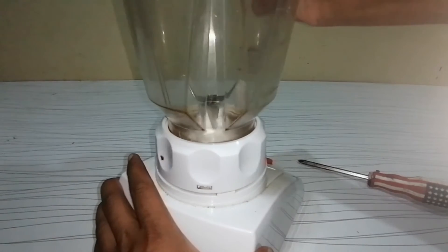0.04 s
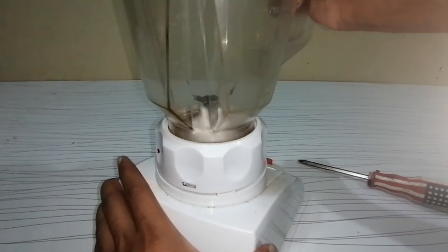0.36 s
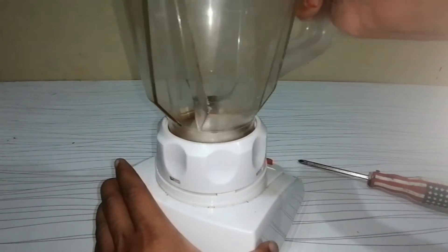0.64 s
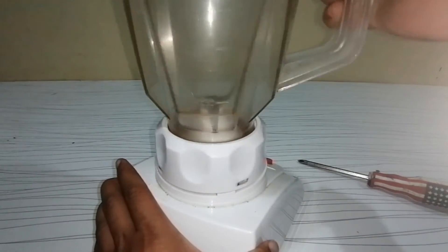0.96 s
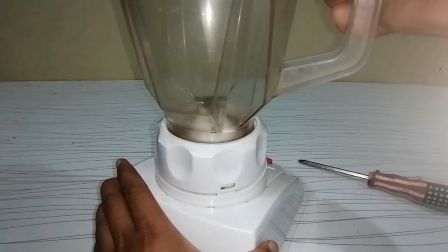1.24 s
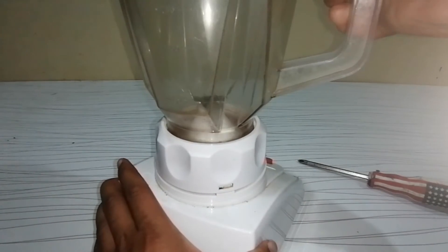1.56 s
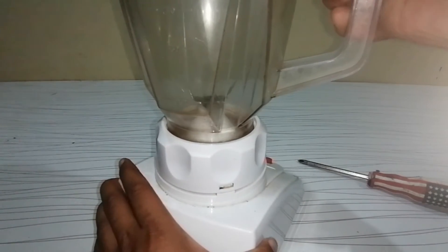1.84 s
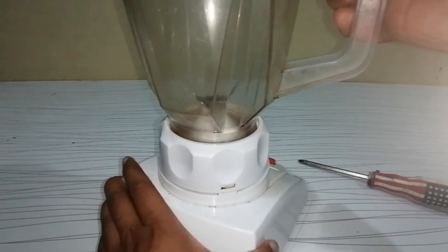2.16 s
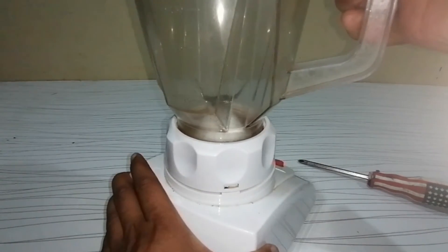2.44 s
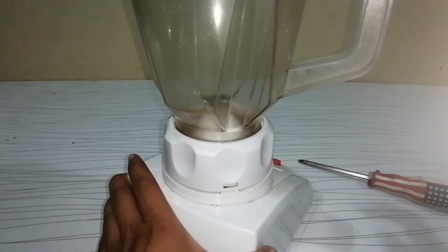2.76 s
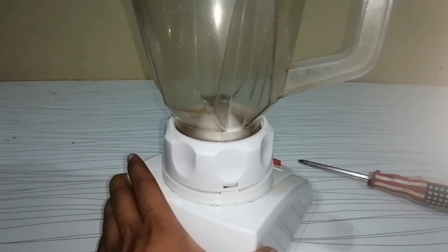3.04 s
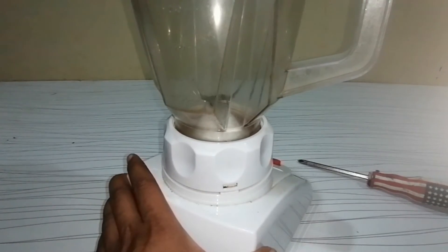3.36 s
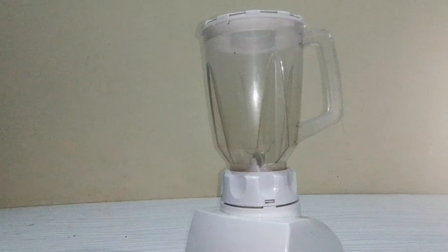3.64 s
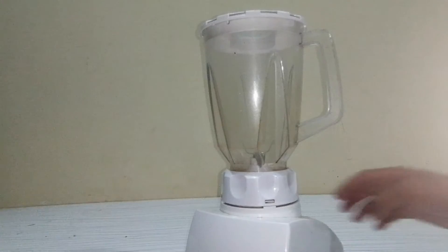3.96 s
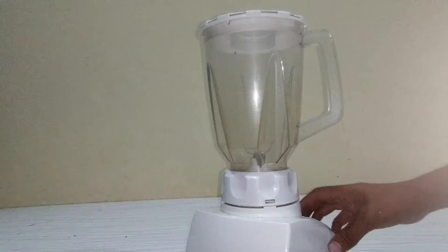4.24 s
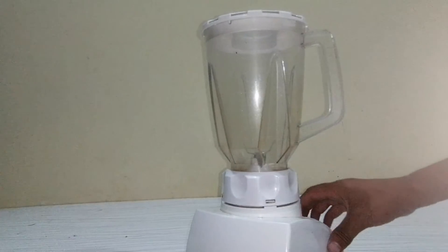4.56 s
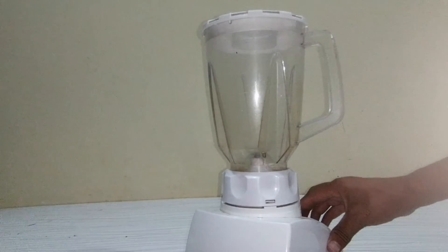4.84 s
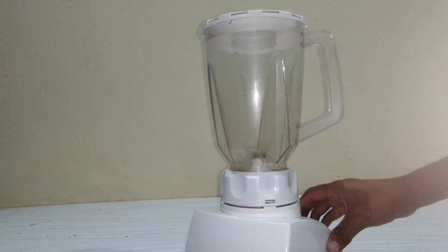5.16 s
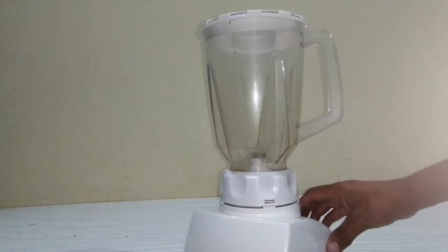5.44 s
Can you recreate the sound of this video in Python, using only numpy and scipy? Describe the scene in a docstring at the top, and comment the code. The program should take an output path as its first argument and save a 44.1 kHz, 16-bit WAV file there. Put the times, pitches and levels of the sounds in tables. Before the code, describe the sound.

A plastic blender jar knocks onto its base and creaks tight, then the switch snaps and the empty motor whirs up loudly.

```python
"""An empty plastic blender, heard close by in a small room. Hands press on the table and the jar knocks
onto its base. It rubs as it is twisted, fingers tap it, and its lugs stick and slip, creaking tight.
The grip shifts and slides, the latch pings twice, the sound cuts out for an instant, and a faint squeak
follows. Then the switch snaps and the motor runs up: a fading mains hum, rushing air, a rattling coupling,
the shake of the unbalanced shaft and a whine that sweeps up through the housing's resonances."""
import sys
import numpy as np
from scipy import signal
from scipy.fft import rfft, irfft, next_fast_len
from scipy.io import wavfile
from scipy.ndimage import uniform_filter1d

SR = 44100
rng = np.random.default_rng(int(sys.argv[2]) if len(sys.argv) > 2 else 0)


def transcribe(signal):
    """Save signal, clipped to [-1, 1], as a 16-bit WAV file at the path in sys.argv[1]."""
    frames = np.atleast_2d(signal).T
    limited = np.clip(frames, -1, 1)
    pcm = np.round(limited * 32767).astype(np.int16)
    wavfile.write(sys.argv[1], SR, pcm)


N = 247401
T = np.arange(N) / SR


def undb(db):
    """Turn decibels into a gain."""
    return 10 ** (np.asarray(db) / 20)


def unit(x):
    """Scale to an average strength (rms) of 1."""
    return x / np.sqrt(np.mean(x ** 2))


def peak(x, db):
    """Scale to a peak level."""
    return x * undb(db) / np.abs(x).max()


def during(start, end, fade):
    """1 between two times, with a fade outside them."""
    return np.clip((T - start) / fade + 1, 0, 1) * np.clip((end - T) / fade + 1, 0, 1)


def envelope(start, attack, hold, release):
    """Swell until start, hold, then fade; attack and release are the times for 20 dB."""
    return undb(-20 * (np.maximum(start - T, 0) / attack + np.maximum(T - start - hold, 0) / release))


def add(track, s, sound):
    """Mix a short sound into a track at s seconds."""
    part = track[max(int(s * SR), 0):][:len(sound)]
    part += sound[:len(part)]


def wander(rate):
    """A random drift of about 1 either way, with rate new values a second."""
    step = int(SR / rate)
    return 1.3 * uniform_filter1d(np.repeat(rng.standard_normal(N // step + 1), step), step)[:N]


def colour(x, points):
    """Shape the tone with a curve of (f/Hz, level/dB) points."""
    hz, db = np.transpose(points)
    size = next_fast_len(len(x) + 4096)
    freqs = np.maximum(np.fft.rfftfreq(size, 1 / SR), 1)
    gain = undb(np.interp(np.log(freqs), np.log(hz), db))
    return irfft(rfft(x, size) * gain, size)[:len(x)]


def band(x, hz, width):
    """One resonance, a pitch at which a thing likes to ring; the narrower, the longer it rings."""
    hz = min(hz, SR / 3)
    return signal.lfilter(*signal.iirpeak(hz, hz / min(width, SR / 4), SR), x)


def ring(x, modes):
    """Ring all of a body's resonances at once."""
    return sum(undb(db) * band(x, hz, width) for hz, width, db in modes)


def lift(hz, modes):
    """Gain of a tone that glides through resonances, 1 far from them."""
    boosts = (undb(db) ** 2 / (1 + (2 * (hz - centre) / width) ** 2) for centre, width, db in modes)
    return np.sqrt(1 + sum(boosts))


def split(x, hz):
    """The parts below and above a frequency."""
    low = signal.sosfiltfilt(signal.butter(4, hz, fs=SR, output="sos"), x, padtype=None)
    return low, x - low


def soften(x, hz):
    """A soft contact passes little above hz."""
    return signal.lfilter(*signal.butter(2, min(hz, SR / 3), fs=SR), x)


def blow(decay_s, chatter, size=10000):
    """A sharp contact followed by a dying chatter."""
    x = chatter * rng.standard_normal(size) * np.exp(-np.arange(size) / SR / decay_s)
    x[0] += 1
    return x


def grains(rate, spread_db):
    """Tiny random hits of uneven size, about rate a second."""
    hits = rng.random(N) < rate / SR
    return unit(hits * rng.standard_normal(N) * undb(spread_db * rng.standard_normal(N)))


def pan(x, db):
    """Make left louder than right by db."""
    return x * undb(np.array([[db], [-db]]) / 2)


def echoes(x, db, count=8, latest_s=0.013):
    """Quick echoes off table and wall boost some pitches and weaken others."""
    lags = rng.integers(SR // 400, int(latest_s * SR), count)
    bounces = sum((-1) ** k * np.roll(x, lag) for k, lag in enumerate(lags))
    return (x + undb(db) / np.sqrt(count) * bounces) / np.hypot(1, undb(db))


def room(x, wet_db, pan_db, fade_s=0.42, dull_hz=5000, size=17640):
    """The direct sound plus the room's short echo, different left and right."""
    t = np.arange(size) / SR
    tail = rng.standard_normal((2, size)) * undb(-60 * t / fade_s) * (t > .002)
    tail = signal.lfilter(*signal.butter(1, dull_hz, fs=SR), tail / np.sqrt(np.sum(tail[0] ** 2)))
    return pan(x + undb(wet_db) * signal.fftconvolve(x[None], tail, axes=1)[:, :N], pan_db)


# How much left and right differ, against what they share: f/Hz, level/dB
STEREO_WIDTH = [(60, -10), (250, -7.5), (500, -6), (1000, -6), (2000, -3), (4000, -2), (8000, 0.5)]
def diffuse(source, pan_db):
    """A noise and its echoes reach left and right alike in the bass, unrelated in the treble."""
    shared, difference = source(), colour(source(), STEREO_WIDTH)
    return pan(shared + difference * np.array([[1], [-1]]), pan_db)


# The drop in the highest treble: f/Hz, level/dB
DULL_TOP_TONE = [(6500, -1.5), (8000, -12), (15000, -10)]
def dull_top(x):
    """The highest treble is dulled, above about 7 kHz."""
    return colour(x, DULL_TOP_TONE)


# The tone of the quiet room: f/Hz, level/dB
QUIET_TONE = [(12, -35), (20, -0.5), (49, -4.5), (80, -11), (119, -13.5), (196, -13.5), (306, -14.5),
              (519, -20), (1100, -26), (1200, -30), (3260, -32), (4070, -39.5), (5380, -32), (7730, -42.5),
              (15500, -40.5)]
def room_tone():
    """The house rumbles low under a thin hiss."""
    noise = diffuse(lambda: unit(colour(rng.standard_normal(N), QUIET_TONE)), pan_db=.5)
    return noise * undb(-64.5 + 1.1 * wander(4.59))


# The table's resonances: f/Hz, width/Hz, level/dB
TABLE_MODES = [(39.2, 24, -15.5), (73.4, 9.5, -4.5), (105.9, 16.6, -6), (199, 7, -8.5), (269.5, 40, -0.5),
               (347, 37, -7.5)]
# Presses of the hands: t/s, hold/s, level/dB
HAND_PRESSES = [(0, 0.0041, -42.5), (0.106, 0.054, -35), (0.29, 0.054, -41.5), (0.453, 0.038, -47),
                (1.297, 0.056, -53.5), (1.867, 0.15, -48.5), (2.176, 0.028, -47), (2.505, 0.18, -47),
                (3.74, 0.062, -59)]
def table_rumble(attack_s=0.073, release_s=0.17, let_go_s=3.08):
    """Hands press and tremble until they let go, shaking the table's lowest resonances."""
    presses = [undb(db) * envelope(s, attack_s, hold, release_s) for s, hold, db in HAND_PRESSES]
    tremble = undb(-67) * during(0, let_go_s, 0.26)
    low, _ = split(ring(rng.standard_normal(N), TABLE_MODES), 153)
    return unit(low) * np.hypot(np.max(presses, axis=0), tremble)


# The jar's resonances: f/Hz, width/Hz, level/dB
JAR_MODES = [(303, 77, 5.5), (410, 130, 1.5), (476, 220, 1), (976, 240, 2.5), (1186, 57, 9.5),
             (1460, 36, -20), (1630, 45, 1), (1966, 190, 1), (2070, 96, -15), (2700, 53, -28),
             (3280, 21, 0), (5000, 2300, -13.5)]
# The jar hits the base: t/s, level/dB, thud above that level/dB, f/Hz (higher for a harder hit)
JAR_HITS = [(0.0688, -23.5, -15, 4870), (0.0735, -17.5, -2, 2940), (0.1127, -30, 3, 1800),
            (0.147, -40, 6, 1200), (0.168, -39.5, 3, 2500), (0.1758, -34.5, 9.5, 2400),
            (0.231, -39.5, 4, 2480), (2.502, -54.5, 15.5, 700)]
def jar_knocks(hits=4, rebound_s=.01, gap_growth=1.1, clack_loss_db=12.5, thud_loss_db=3):
    """The jar lands and rocks; each hit and its weaker rebounds ring the jar and thud into the table."""
    out = np.zeros(N)
    for s, db, thud_db, hard_hz in JAR_HITS:
        for k in range(hits):
            contact = soften(blow(decay_s=0.0037, chatter=0.34), hard_hz)
            crack = band(band(contact, 830, 450), 830, 450)
            clack = ring(contact, JAR_MODES) + undb(5) * crack
            thud = ring(soften(blow(decay_s=0.0023, chatter=0.046), 750), TABLE_MODES)
            add(out, s, peak(clack, db - k * clack_loss_db))
            add(out, s, peak(thud, db + thud_db - k * thud_loss_db))
            s += rebound_s * gap_growth ** k * (1 + 0.11 * rng.standard_normal())
    return room(dull_top(out), wet_db=-4, pan_db=1)


def rub(strokes, tone, modes, rate, ring_db, rough_db):
    """Many tiny slips ring a plastic part; each stroke swells and fades with its own brightness."""
    slips = grains(rate, spread_db=1) * undb(rough_db * wander(90))
    low, high = split(colour(slips + undb(ring_db) * ring(slips, modes), tone), 3470)
    low_gain = high_gain = np.zeros(N)
    for s, attack, hold, release, db, treble_db in strokes:
        swell = envelope(s, attack, hold, release) * undb(db)
        low_gain = np.maximum(low_gain, swell)
        high_gain = np.maximum(high_gain, swell * undb(treble_db))
    return unit(low) * low_gain + unit(high) * high_gain


# Turns of the jar: t/s, swell/s, hold/s, fade/s, level/dB, treble above that level/dB
TWISTS = [(0.31, 0.13, 0.054, 0.14, -59, -7.5), (0.91, 0.59, 0.11, .55, -58, -7.5),
          (1.2, 0.22, 0.035, 0.18, -51.5, -9), (1.392, 0.027, 0.023, 0.052, -51.5, -24)]
# Their tone: f/Hz, level/dB
TWIST_TONE = [(88, -48), (150, -11), (289, -0.5), (337, 1), (425, -24), (589, -14), (661, -10), (1030, -11),
              (1230, -3), (1430, -10), (2970, -11.5), (4050, -26.5), (5100, -16.5), (8920, -33.5),
              (15000, -49)]
def jar_twist():
    """Plastic rubs on plastic as the jar turns."""
    return echoes(rub(TWISTS, TWIST_TONE, JAR_MODES, rate=7500, ring_db=-3, rough_db=1.5), db=-7.5)


# Taps on plastic: t/s, level/dB, f/Hz, decay/s
TAPS = [(0.54, -60, 5000, .004), (0.907, -44, 1490, 0.0048), (1.812, -52.5, 1160, 0.018),
        (1.816, -56.5, 5500, 0.012), (1.914, -52, 3000, 0.0044), (1.989, -56, 770, .035),
        (2.012, -53, 2900, 0.018), (2.098, -43.5, 590, 0.0076), (2.163, -64, 4000, 0.013),
        (2.531, -52.5, 6500, 0.0037), (4.326, -56, 457, 0.011), (4.485, -56, 405, 0.017),
        (4.685, -56.5, 1100, 0.017)]
def finger_taps():
    """Fingers tap the plastic, which barely rings."""
    out = np.zeros(N)
    for s, db, hz, decay_s in TAPS:
        tap = blow(decay_s, chatter=0.77)
        add(out, s, peak(band(band(tap, hz, 0.8 * hz), hz, 0.8 * hz), db))
    return dull_top(out)


# The collar's resonances: f/Hz, width/Hz, level/dB
COLLAR_MODES = [(292, 34, 13), (450, 117, 5.5), (722, 78, 1.5), (1144, 140, 12.5), (1570, 63, -9),
                (1756, 65, 3), (3040, 410, -4), (4620, 130, 2), (5160, 450, 3), (5860, 280, -18)]
# Short runs of slips: t/s, length/s, level/dB, treble change/dB
SLIP_RUNS = [(1.394, .03, -40.5, -8), (1.437, .025, -35, -12), (1.466, .069, -28, -3.5),
             (1.548, .004, -25, -7), (1.563, .004, -25.5, -7), (1.573, .032, -26.5, -4),
             (1.625, .004, -37.5, -4)]
def lug_creak(max_slips=12, slip_hz=137.8, jitter=.06, scatter_db=1.3):
    """The lugs, the tabs that lock the jar, stick and slip almost evenly; each slip rings the collar."""
    out = np.zeros(N)
    for start, length, db, treble_db in SLIP_RUNS:
        s = start
        for spacing, strength in rng.standard_normal((max_slips, 2)):
            snap = blow(decay_s=0.0027, chatter=0.17, size=4096)
            if s < start + length:
                low, high = split(ring(snap, COLLAR_MODES), 2800)
                add(out, s, peak(low + undb(treble_db + 1.5) * high, db + scatter_db * strength))
            s += (1 + jitter * spacing) / slip_hz
    return room(dull_top(out), wet_db=-8, pan_db=2.3, fade_s=.3, dull_hz=2200)


def finger_shuffle(hz=850, width_hz=900):
    """Fingers feel for a new grip with a faint, dull, uneven rub."""
    touch = grains(rate=4000, spread_db=2) * undb(2 * wander(30.2))
    dull = unit(band(band(touch, hz, width_hz), hz, width_hz))
    return room(dull * undb(-66) * during(1.994, 2.29, 0.033), wet_db=-2, pan_db=1.5)


# Slides of the hand: t/s, swell/s, hold/s, fade/s, level/dB, treble above that level/dB
HAND_SLIDES = [(2.352, 0.039, 0.064, 0.084, -47, -1), (2.8, 0.059, 0.078, 0.03, -61, 1.5)]
# Their tone: f/Hz, level/dB
SLIDE_TONE = [(110, -42), (180, -17), (265, 7.5), (297, -1), (364, 5), (645, -6.5), (708, 0), (1060, -5.5),
              (1330, -4), (1510, -7), (3000, -11.5), (3740, -27), (7020, -32), (8930, -44.5), (15000, -55)]
# The handle's resonances: f/Hz, width/Hz, level/dB
HANDLE_MODES = [(271, 21, 0), (1270, 82, 0), (3070, 240, -4), (5000, 510, 7.5), (6900, 310, 5)]
def grip_slide():
    """The hand slides on the jar and rings its handle."""
    return echoes(rub(HAND_SLIDES, SLIDE_TONE, HANDLE_MODES, rate=16000, ring_db=-7, rough_db=1), db=-6)


# The latch's resonances: f/Hz, width/Hz, level/dB
LATCH_MODES = [(558, 20, -1), (1054, 27, 10.5), (1080, 120, -8), (2680, 2100, -16), (4861, 500, -19)]
# Its pings: t/s, level/dB
LATCH_HITS = [(2.8796, -34.5), (2.9083, -32.5)]
def latch_pings():
    """The latch rings twice as it settles."""
    out = np.zeros(N)
    for s, db in LATCH_HITS:
        add(out, s, peak(ring(blow(decay_s=0.005, chatter=0.15), LATCH_MODES), db))
    return dull_top(out)


def squeak(start=3.72, end=3.8, hz=870, waver=0.072):
    """A faint, wavering tone and the octave above it."""
    phase = 2 * np.pi * np.cumsum(hz * (1 + waver * wander(290))) / SR
    tone = np.sin(phase) + undb(-2) * np.sin(2 * phase)
    gate = during(start, end, 0.022) * during(start, np.inf, 0.004)
    return room(tone * undb(-70) * gate, wet_db=3, pan_db=0)


SWITCH_S, POWER_S, TOP_SPEED_HZ = 4.757, 4.779, 288.4
# The motor housing's resonances: f/Hz, width/Hz, level/dB
HOUSING_MODES = [(368, 13, 3.5), (520, 31, 2), (718, 48, 1), (903, 30, 1), (1194, 31, 5.5), (1293, 21, 3),
                 (1790, 420, -5), (2210, 134, -0.5), (2454, 26, 2.5), (2920, 170, -3), (3110, 110, -6),
                 (4670, 74, 0), (4740, 130, -25), (5280, 200, -3), (5980, 91, -6)]
def switch():
    """The switch snaps over, then the coupling between motor and jar takes up its slack."""
    out = np.zeros(N)
    snap = soften(ring(blow(decay_s=0.045, chatter=0.77), HOUSING_MODES), 2000)
    clunk = soften(ring(blow(decay_s=0.016, chatter=0.55), JAR_MODES), 1900)
    add(out, SWITCH_S, peak(snap, -27.5))
    add(out, SWITCH_S + 0.016, peak(clunk, -23.5))
    return room(dull_top(out), wet_db=-6, pan_db=1.5)


def mains_hum(speed, mains_hz=50):
    """The starting current makes the iron hum at twice the mains rate; it fades as speed builds."""
    level = undb(-27 + 3.5 * wander(45)) * (1 - speed) ** 1.6
    return level * np.sin(2 * np.pi * 2 * mains_hz * T) * during(4.81, np.inf, 0.041)


# The tone of the rushing air: f/Hz, level/dB
AIR_TONE = [(70, -36), (150, -17.5), (300, 2), (420, -4), (600, -9.5), (1000, -3), (1450, -8.5),
            (3100, -11), (4150, -18), (4750, -4), (6400, -7.5), (7900, -19.5), (12000, -25), (15000, -26.5)]
def air_and_rattle(angle, speed):
    """Fan and blades push air; the loose coupling rattles the housing once a turn."""
    chatter = grains(rate=2200, spread_db=2.5) * (1 + .5 * np.cos(angle))
    rattle = dull_top(ring(chatter, HOUSING_MODES))
    air = colour(grains(rate=12000, spread_db=1), AIR_TONE) * undb(0.63 * wander(110))
    low, high = split(undb(-0.5) * unit(air) + unit(rattle), 4040)
    db = -30 + 6.5 * speed ** 1.75  # louder with speed
    treble_db = -13.5 + 6 * speed  # and brighter
    return (unit(low) + unit(echoes(high, db=-11.5)) * undb(treble_db)) * undb(db)


# Resonances of the base on its feet: f/Hz, width/Hz, level/dB
FEET_MODES = [(194, 14, 0), (246, 11.5, 10.5), (275.9, 5.7, 15.5)]
def shaft_shake(angle, speed):
    """The unbalanced shaft rocks the base once a turn, most where its rate meets a resonance."""
    shake = undb(-37) * speed * lift(TOP_SPEED_HZ * speed, FEET_MODES) * np.sin(angle)
    octave = undb(-40 + 2.5 * wander(20)) * speed ** 3 * np.sin(2 * angle)
    return np.sqrt(2) * (shake + octave)


# The tones of the whine: cycles per turn of the shaft, level/dB
WHINE_TONES = [(8, -2), (12, 4), (24, -0.5)]
# Resonances of the air in the housing: f/Hz, width/Hz, level/dB
CAVITY_MODES = [(1710, 140, 11), (2436, 145, 12), (2930, 160, 2), (6070, 320, 5.5)]
def whine(angle, speed):
    """Fan and commutator (the motor's turning contacts) sing, swelling as they pass each resonance."""
    loose_angle = angle + .06 * wander(420)  # play in the shaft makes the tones flutter
    tones = np.zeros(N)
    for cycles, db in WHINE_TONES:
        level = undb(db + 2.5 * wander(130)) * lift(cycles * TOP_SPEED_HZ * speed, CAVITY_MODES)
        tones += level * np.sin(cycles * loose_angle)
    housed = undb(-1.5) * ring(tones, HOUSING_MODES) + undb(-6.5) * tones
    return room(housed * undb(-37) * speed ** 0.72, wet_db=-5.5, pan_db=0.5)


# The motor stands a little off centre: f/Hz, left minus right level/dB
MOTOR_BALANCE = [(100, -4), (200, -8), (300, -.5), (2400, -.5), (4400, -0.5), (7500, 5.5), (13000, -5)]
def motor(run_up_s=.208, run_up_shape=.8):
    """The shaft runs up against the drag of the air, and all the motor's sounds follow its speed."""
    age = np.maximum(T - SWITCH_S, 0)
    speed = 1 - np.exp(-(age / run_up_s) ** run_up_shape)  # 0 at rest, 1 at top speed
    shaft_hz = TOP_SPEED_HZ * speed * (1 + 0.00368 * wander(60))
    angle = 2 * np.pi * np.cumsum(shaft_hz) / SR
    drone = shaft_shake(angle, speed) + mains_hum(speed)
    rush = diffuse(lambda: air_and_rattle(angle, speed), pan_db=0)
    left, right = drone + rush + whine(angle, speed)
    left = colour(left, [(hz, db / 2) for hz, db in MOTOR_BALANCE])
    right = colour(right, [(hz, -db / 2) for hz, db in MOTOR_BALANCE])
    return during(POWER_S, np.inf, 0.0079) * np.array([left, right])


def scene():
    """The jar is set down and locked, then the motor starts, all over the quiet of the room."""
    contacts = jar_knocks() + lug_creak() + room(finger_taps() + latch_pings(), wet_db=-5, pan_db=4)
    rubbing = finger_shuffle() + diffuse(jar_twist, pan_db=3.5) + diffuse(grip_slide, pan_db=2.2)
    handling = contacts + rubbing + diffuse(table_rumble, pan_db=1) + squeak()
    return handling + switch() + motor() + room_tone()


def record(dry, cut_hz=15600):
    """The sound drops out for an instant, and the highest treble is cut."""
    dropout = 1 - during(3.627, 3.642, .002)
    return signal.sosfilt(signal.ellip(8, .2, 70, cut_hz, fs=SR, output="sos"), dry * dropout)


dry = scene()
out = record(dry)
transcribe(out)
```